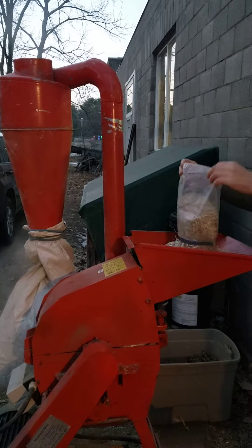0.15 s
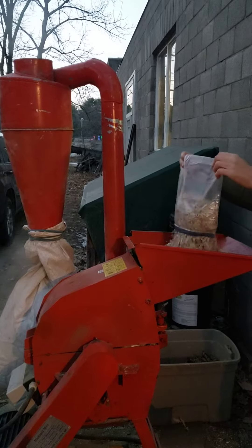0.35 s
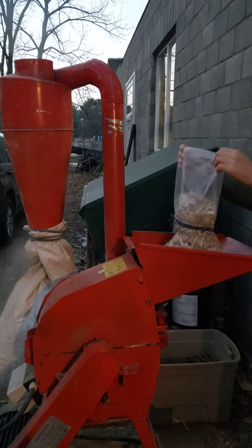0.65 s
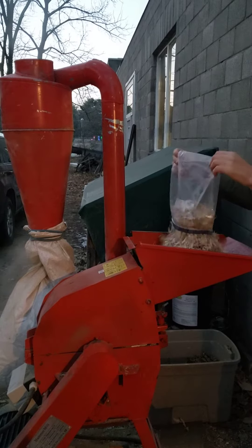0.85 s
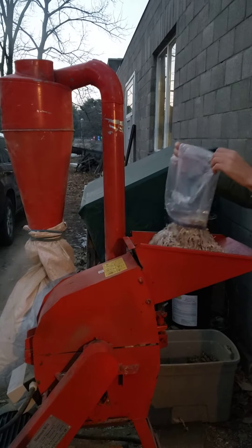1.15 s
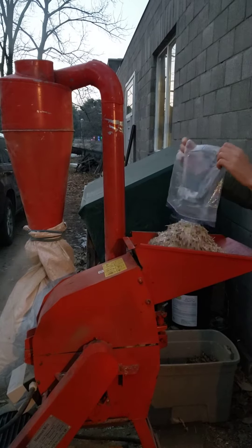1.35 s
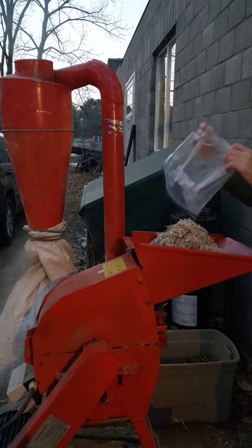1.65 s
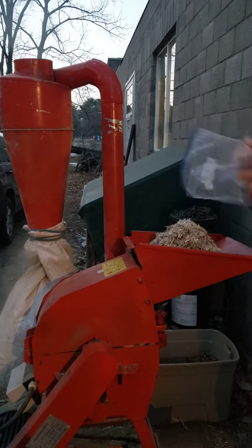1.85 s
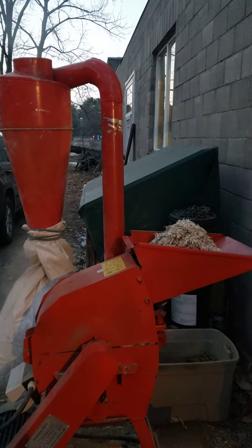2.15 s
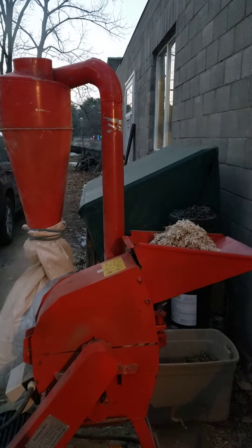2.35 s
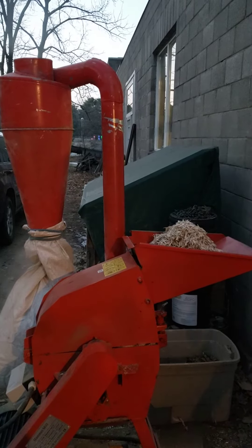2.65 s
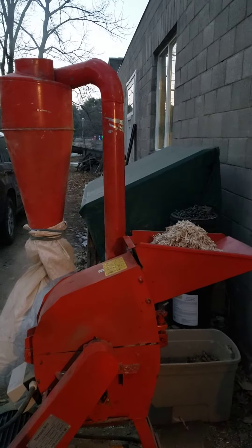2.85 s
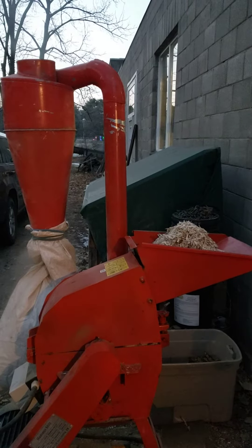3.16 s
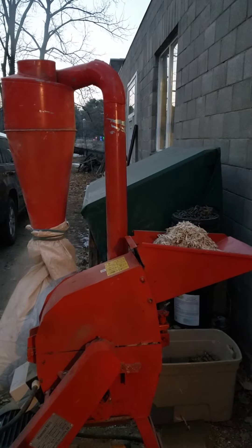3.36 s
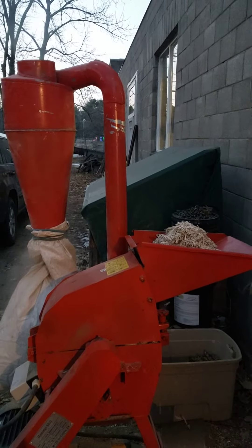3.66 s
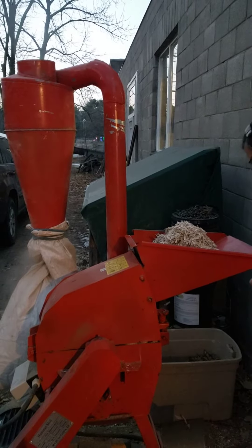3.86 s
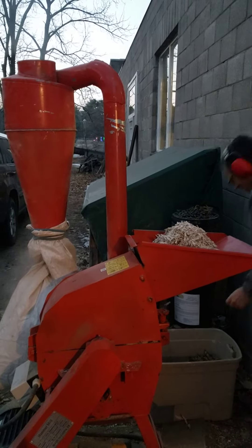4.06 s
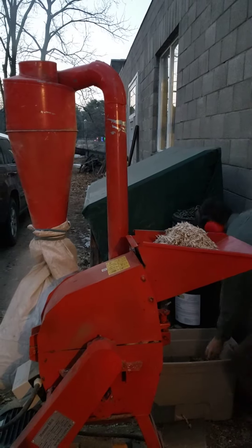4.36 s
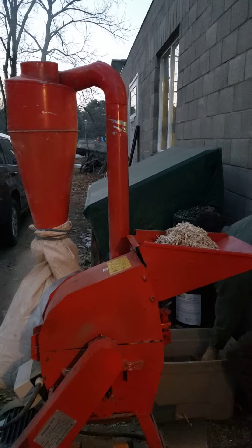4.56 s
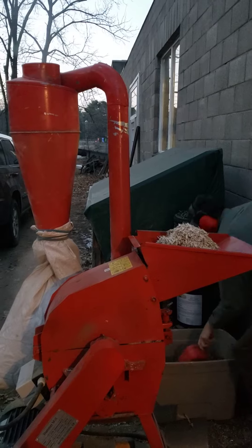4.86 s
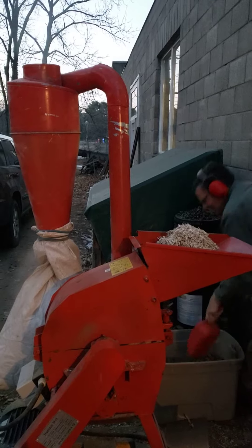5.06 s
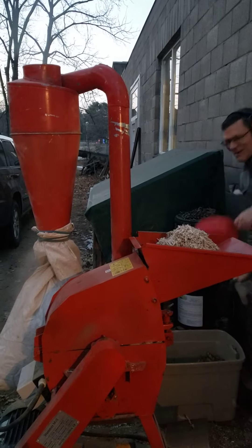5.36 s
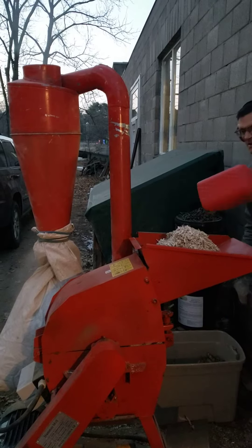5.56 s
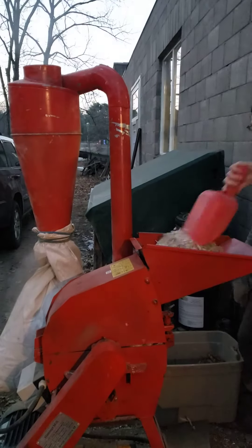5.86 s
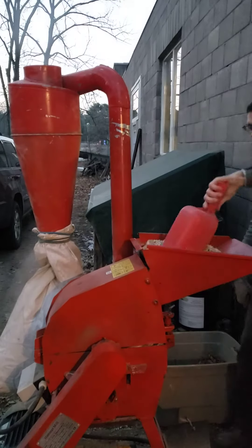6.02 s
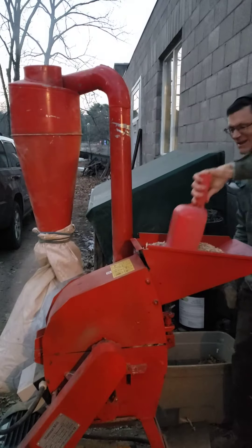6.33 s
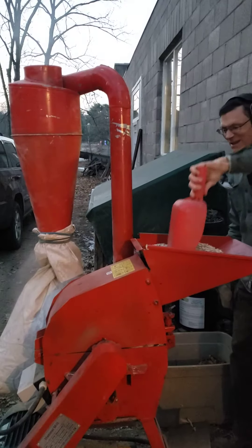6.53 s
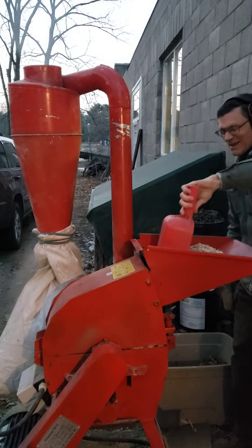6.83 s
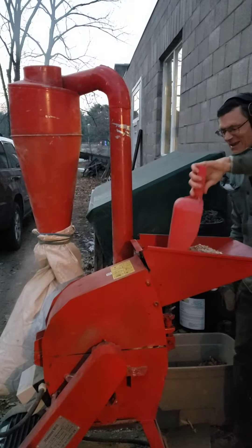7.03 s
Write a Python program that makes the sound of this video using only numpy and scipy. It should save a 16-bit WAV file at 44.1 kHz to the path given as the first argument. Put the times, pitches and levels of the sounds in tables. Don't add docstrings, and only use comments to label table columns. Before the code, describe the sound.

Loud steady grinding machine drone beside a block wall: buzzing mid-low hum, rushing blower air, metallic whine and faint squeal, slowing a little as it is fed.

```python
import sys
import numpy as np
from scipy import signal
from scipy.fft import rfft, irfft, next_fast_len
from scipy.io import wavfile
from scipy.ndimage import uniform_filter1d, map_coordinates

SR = 44100
rng = np.random.default_rng(int(sys.argv[2]) if len(sys.argv) > 2 else 0)


def unload_audio(sound):
    columns = np.transpose(np.atleast_2d(sound))
    steps = np.round(np.clip(columns, -1, 1) * 32767)
    wavfile.write(sys.argv[1], SR, steps.astype(np.int16))


def ratio(d):
    e = np.asarray(d, float) / 20
    return 10 ** e


N = 317067
ROWS = 4


def unit(x):
    return x / np.sqrt(np.mean(x ** 2) + 1e-20)


def along(points, hz):
    f, v = np.transpose(points)
    return np.interp(np.log(hz + 1), np.log(f + 1), v)


def curves(rows):
    s, *columns = np.transpose(rows)
    return [np.interp(np.arange(N) / SR, s, column) for column in columns]


def wobble(rate):
    knots = rng.standard_normal(int(N * rate / SR) + 4)
    return map_coordinates(knots, [np.arange(N) * rate / SR], order=1)


def ramp(start, length):
    return np.clip((np.arange(N) / SR - start) / length, 0, 1)


def filtered(x, response):
    m = next_fast_len(N + 8192)
    return irfft(rfft(x, m) * response(np.fft.rfftfreq(m, 1 / SR)), m)[..., :N]


def sides(db):
    return ratio(np.array([db, -db]) / 2)


def tone(angle, db, pan_db, lead, waver_db):
    pair = np.cos(angle + np.array([[.5], [-.5]]) * lead)
    gains = sides(pan_db + np.zeros(1))
    gains = 2 * gains / np.linalg.norm(gains, axis=0)
    return ratio(db + waver_db * wobble(5)) * gains * pair


TURNED = {(0, 6): (-8, -.7), (0, 8): (-1, -.9), (0, 12): (-3, -.7), (2, -2): (1, -.8), (2, -1): (-5, 2.3),
          (2, 0): (2, -1), (2, 1): (2, -.45)}
SHADED = {(2, 5): (1.6, -10), (-1, 15): (1.6, 3), (-1, 13): (3.0, 7), (0, 8): (3.2, -2.5), (3, 1): (2.6, 3)}
SHADE_S = 0.98


def comb(keys, angles, rows, fed, waver_db):
    out = 0
    for key, angle, (empty_db, fed_db, pan_db, lead) in zip(keys, angles, rows):
        turn_db, turn_rad = TURNED.get(key, (0, 0))
        start, shade_db = SHADED.get(key, (0, 0))
        db = empty_db + (fed_db - empty_db) * fed + shade_db * ramp(start, SHADE_S)
        out = out + tone(angle, db, pan_db + turn_db * fed, lead + turn_rad * fed, waver_db)
    return out


# shaft_order, empty_db, fed_db, left_right_db, left_lead_rad
ROTOR = [(1, -54, -56, -2, 0), (2, -41, -42, 0, -.2), (3, -40, -36, -1, -.2), (5, -37, -36, 0, -.3),
         (6, -28, -26, -3, 2.4), (7, -41, -45, 4, -.4), (8, -33, -35, -2, -1.9), (9, -41, -41, -2, -.6),
         (10, -47, -48, -3, -.8), (11, -46, -42, 3, -1.4), (12, -37, -38, 2, -.2), (14, -47, -51, -1, 1.7),
         (16, -49, -51, -3, -2.9), (18, -51, -46, -5, 0), (13, -49, -51, -1, .5), (20, -49, -53, 0, -.9),
         (23, -48, -52, -2, -.5)]
HUM_PAN_DB = -1.6


def rotor(shaft, beat_db, fed):
    hum_pan_db = HUM_PAN_DB - 0.55 * fed
    hum = tone(ROWS * shaft - np.pi / 2, beat_db - 0.5, hum_pan_db, lead=-0.16, waver_db=0.3)
    angles = []
    for order, *_ in ROTOR:
        if order < 7 or order in (8, 12):
            phase = np.pi * ((order % ROWS == 2) - .5)
        else:
            phase = rng.uniform(0, 2 * np.pi)
        angles.append(order * shaft + phase)
    keys = [(0, row[0]) for row in ROTOR]
    return hum + comb(keys, angles, [row[1:] for row in ROTOR], fed, waver_db=0.73)


BEARING = {1: [(-3, -45, -47, 1, .1), (-2, -46, -57, 1, .1), (-1, -42, -44, -2, -.3),
           (0, -46, -48, -5, -.1), (1, -35, -35, 2, -.3), (3, -48, -50, 0, -.6), (4, -48, -50, 6, -1.4)],
           -1: [(14, -33, -35, 1, .3), (15, -36, -44, 4, -.6), (13, -42, -44, 0, -.1),
           (17, -47, -53, -1, -1), (19, -47, -45, -3, -1.3)], 2: [(-2, -36, -37, -7, 1.9),
           (-1, -35, -32, -2, 2.8), (-4, -58, -41, 5, .8), (5, -38, -44, -8, -1), (0, -33, -35, -3, 2.6),
           (1, -30, -30, -3, -2.3), (2, -39, -43, -12, -1.2), (4, -42, -47, -7, -1.9)],
           3: [(7, -54, -56, -3, -.2), (-1, -49, -46, -11, -.9), (1, -44, -45, -2, -2)]}


def bearing_tones(shaft, balls, fed):
    keys, angles, rows = [], [], []
    for m, family in BEARING.items():
        for k, *row in family:
            keys.append((m, k))
            angles.append(m * balls + k * shaft + rng.uniform(0, 2 * np.pi))
            rows.append(row)
    return comb(keys, angles, rows, fed, waver_db=1.66) * ratio(0.36)


# centre_hz, width_hz, level_db
HOUSING = [(1150, 230, -11.5), (1670, 730, -27), (4420, 90, 6), (4690, 120, 4), (5300, 200, 4),
           (6240, 430, -10)]


def housing_clicks(shaft, balls):
    passes = np.diff(np.floor(balls / (2 * np.pi)), prepend=0)
    load = np.exp(0.4 * np.cos(shaft))
    clicks = passes * load * (0.47 + rng.standard_normal((2, N)))

    def ring(hz):
        total = 0
        for i, (centre, width, db) in enumerate(HOUSING):
            damping = 1j * hz * width
            total = total + (-1) ** i * ratio(db) * damping / (centre * centre - hz * hz + damping)
        return total

    return ratio(-40) * unit(filtered(clicks, ring)) * sides(-5 + np.zeros(1))


def squeal(angle, db, width, pan_db):
    pair = [wobble(width) * np.cos(angle) + wobble(width) * np.sin(angle) for _ in "LR"]
    return ratio(db) * unit(np.array(pair)) * sides(pan_db + np.zeros(1))


# middle_s, half_length_s, level_db
SKIDS = [
    (1.2, .6, -48),
    (5.2, 1.7, -41),
]
SKID_REST_DB = -56
SQUEAL_DB, SQUEAL_FED_DB = -39, -3


def squeals(shaft, fed):
    lower_db = SQUEAL_DB + SQUEAL_FED_DB * fed + 0.67 * wobble(1.602)
    t = np.arange(N) / SR
    upper_db = SKID_REST_DB
    for middle, half, db in SKIDS:
        upper_db = upper_db + (db - SKID_REST_DB) * np.exp(-((t - middle) / half) ** 6)
    lower = squeal(76.6 * shaft, lower_db, width=120, pan_db=-11.5)
    return lower + squeal(85 * shaft, upper_db, width=80, pan_db=-8)


def bearing(shaft, balls, fed):
    return bearing_tones(shaft, balls, fed) + housing_clicks(shaft, balls) + squeals(shaft, fed)


# freq_hz, likeness (1 = same)
ALIKE = [(60, .95), (200, .96), (300, .86), (450, .6), (700, .7), (950, .4), (1100, .2), (1300, .4),
         (2000, .2), (3200, .25), (5000, .1), (15000, .1)]
# freq_hz, left_lead_rad
LEAD = [(60, 0.5), (300, -1.26), (550, -0.9), (950, -0.55), (1100, -2.5), (1500, -1.93), (2300, -2.5),
        (3200, -3), (15000, 0)]


def rush(spectra, band, patchy_db):
    z = signal.stft(rng.standard_normal((2, N)), nperseg=512)[2]
    field = uniform_filter1d(rng.standard_normal(z.shape[1:]), size=6, axis=0)
    field = uniform_filter1d(field, size=10, axis=1)
    pair = signal.istft(z * ratio(patchy_db * unit(field)), nperseg=512)[1][:, :N]

    def mid_side(hz):
        turn = np.arccos(np.clip(along(ALIKE, hz), 0, 1)) / 2
        return band(hz) * np.array([np.cos(turn), np.sin(turn)])

    def ports(hz):
        colour = ratio([along(spectrum, hz) for spectrum in spectra])
        return colour * np.exp([[.5j], [-.5j]] * along(LEAD, hz))

    mid, side = filtered(pair, mid_side)
    return unit(filtered(np.array([mid + side, mid - side]), ports))


def handover(hz):
    return np.pi / 2 * np.clip((hz - 2300) / 600, 0, 1)


# freq_hz, level_db (per Hz)
ROAR = [
    [(21, -42), (45, -14), (86, -9.5), (433, 4), (748, -3.5), (869, 3), (1248, 0.5), (1345, -1.5),
     (1709, 0.5), (1862, -1.2), (1943, -6), (2500, -3), (2605, -23)],
    [(21, -40), (45, -15), (86, -12), (312, 3.5), (635, 0), (715, 1), (837, 0), (974, -3), (1047, 4.5),
     (1305, 3), (1386, 2), (1693, 4), (2605, -5.5)],
]
ROAR_DB = -26


def blower_roar(shaft, swell_db):
    throb = 1 + 0.037 * np.cos(shaft) + 0.084 * np.cos(2 * shaft + 1.0)
    throb = throb + 0.037 * np.cos(4 * shaft + 0.38)
    noise = rush(ROAR, lambda hz: np.cos(handover(hz)), patchy_db=0.7)
    return ratio(ROAR_DB + swell_db) * throb * noise


# freq_hz, level_db (per Hz)
HISS = [
    [(2600, -8.5), (3560, -10), (4400, -9.5), (5500, -9), (6300, -9), (7500, -13.5), (8300, -28),
     (9200, -30), (9800, -19), (10800, -18), (12000, -17.5), (13000, -17.5), (14400, -14), (15700, -21)],
    [(2600, -4.5), (3560, -10), (3680, -4), (5140, -1), (5520, 2), (6200, -1.5), (6310, -6), (6500, -4),
     (7200, -14.5), (7450, -9), (8500, -13.5), (10900, -18), (12100, -4.2), (14050, -12), (15400, -4.3),
     (15750, -6)],
]
HISS_DB = -25


def screen_hiss(shaft, swell_db):
    flutter = 1 + 0.043 * np.cos(shaft + 0.83) + .04 * np.cos(3 * shaft + 2.1)
    noise = rush(HISS, lambda hz: np.sin(handover(hz)), patchy_db=0.64)
    hiss = ratio(HISS_DB + swell_db + 0.2 * wobble(12)) * flutter * noise

    def bounce(hz):
        late = np.exp(-2j * np.pi * hz * .00194)
        return 1 + np.array([[.22], [.1]]) * (hz < 8200) * late

    return filtered(hiss, bounce)


SWELL_DB, SWAY_DB = 0.32, 1.2


def air(shaft):
    swell_db = SWELL_DB * wobble(1.486)
    return (blower_roar(shaft, swell_db) + screen_hiss(shaft, swell_db)) * sides(SWAY_DB * wobble(1.456))


# time_s, beat_hz, level_db
HUM = [(0, 288.5, -19), (.45, 288.7, -20), (.8, 289.7, -19), (1.5, 290.2, -19), (2.5, 290.5, -20),
       (3.15, 289.9, -19.5), (4.35, 290.4, -18.5), (5.2, 289.6, -18.5), (5.6, 289.6, -19),
       (5.9, 289.7, -18.5), (6.45, 287.7, -19), (7.19, 284.6, -20.5)]
BALLS_PER_TURN, CAGE_SAG_PER_S = 8.333, .0062
FEED_S, FEED_RISE_S = 5.66, 0.81


def scene():
    beat_hz, beat_db = curves(HUM)
    turns_hz = beat_hz / ROWS
    balls_hz = turns_hz * (BALLS_PER_TURN - CAGE_SAG_PER_S * np.arange(N) / SR)
    shaft = 2 * np.pi * np.cumsum(turns_hz) / SR
    balls = 2 * np.pi * np.cumsum(balls_hz) / SR + .08 * wobble(25)
    fed = ramp(FEED_S, FEED_RISE_S)
    return rotor(shaft, beat_db, fed) + bearing(shaft, balls, fed) + air(shaft)


def top_cut(x):
    return signal.sosfilt(signal.butter(12, 16970, fs=SR, output="sos"), x)


def record(dry):
    mix = filtered(dry, lambda hz: hz < 15740)
    return top_cut(mix)


dry = scene()
out = record(dry)
unload_audio(out)
```